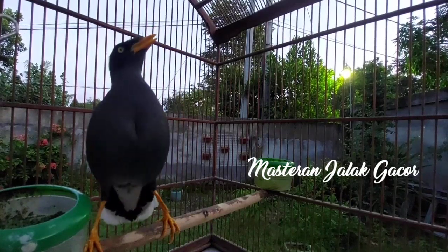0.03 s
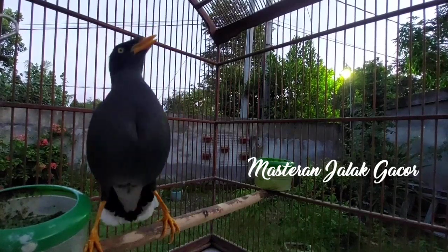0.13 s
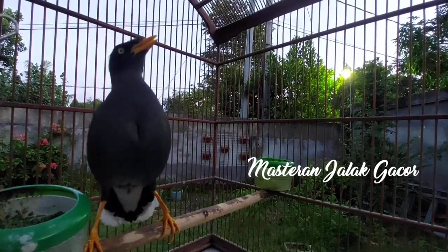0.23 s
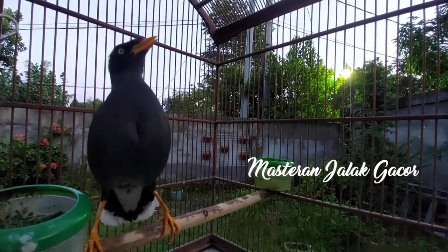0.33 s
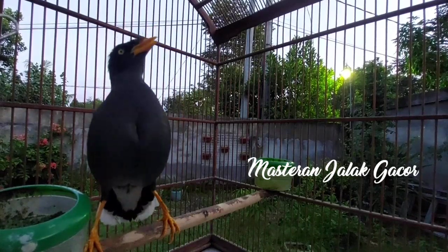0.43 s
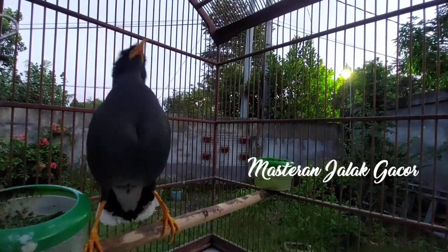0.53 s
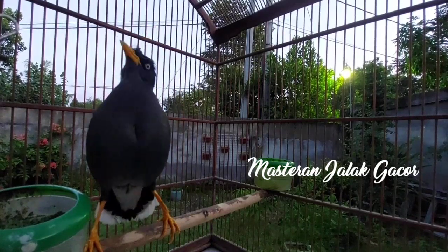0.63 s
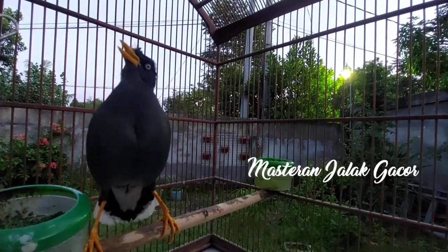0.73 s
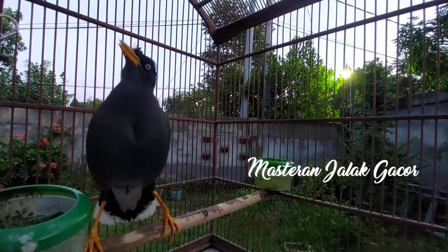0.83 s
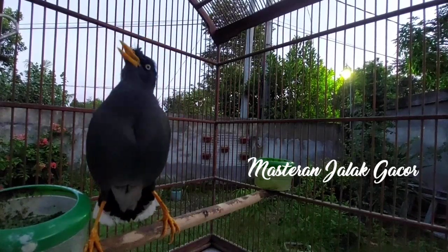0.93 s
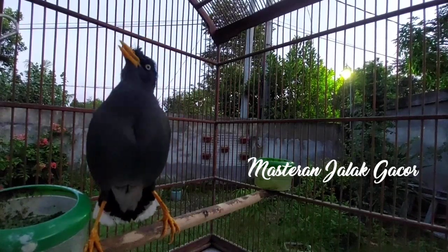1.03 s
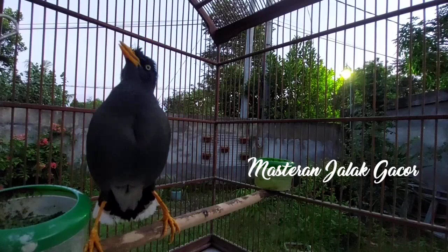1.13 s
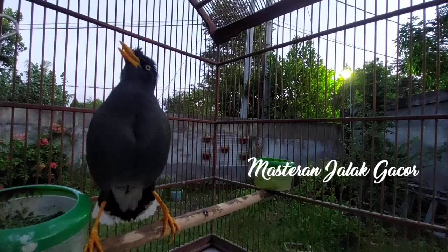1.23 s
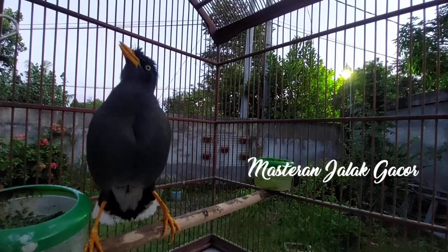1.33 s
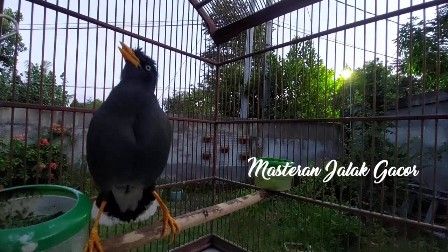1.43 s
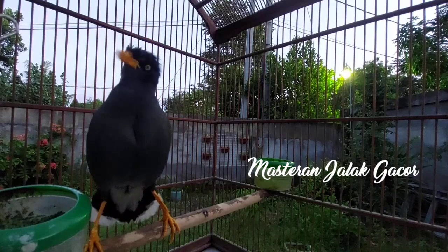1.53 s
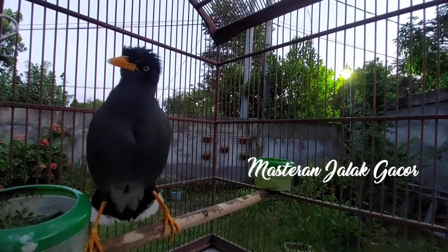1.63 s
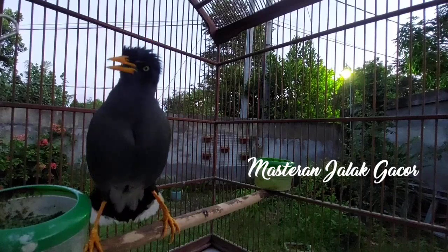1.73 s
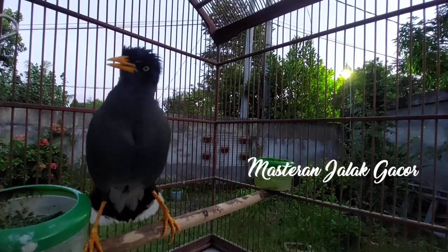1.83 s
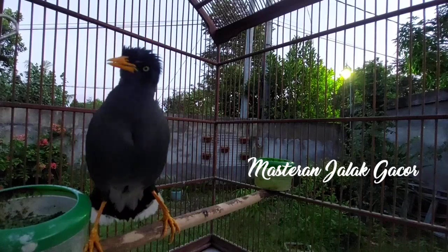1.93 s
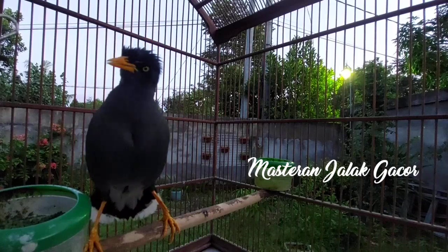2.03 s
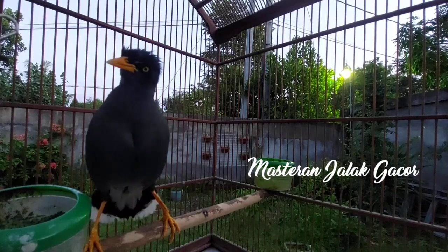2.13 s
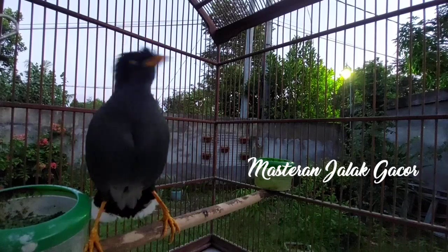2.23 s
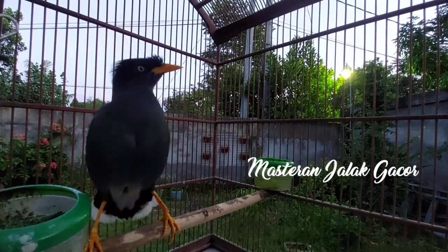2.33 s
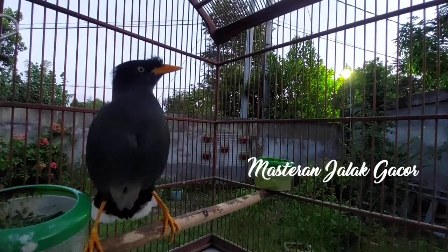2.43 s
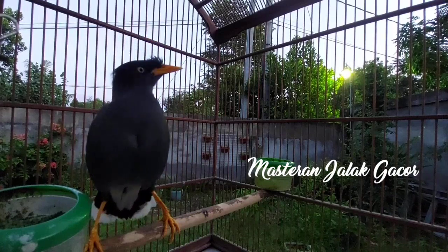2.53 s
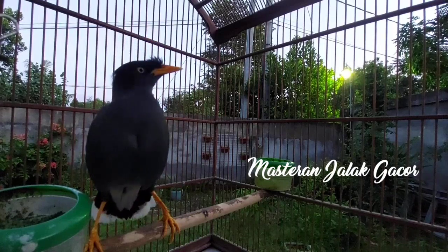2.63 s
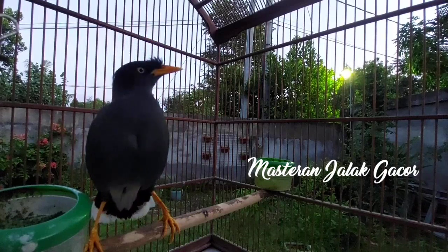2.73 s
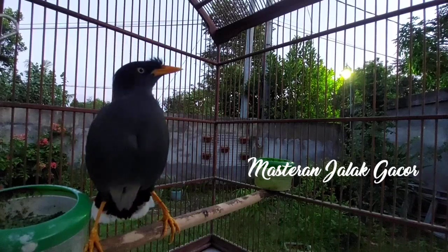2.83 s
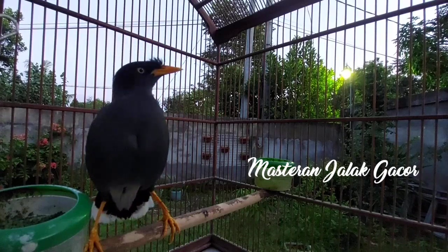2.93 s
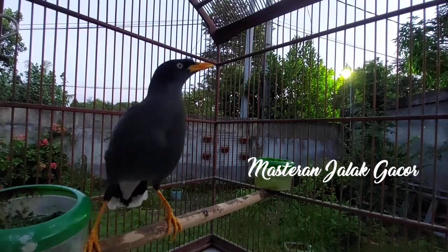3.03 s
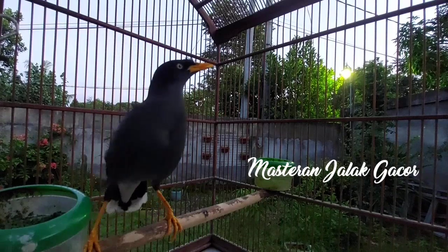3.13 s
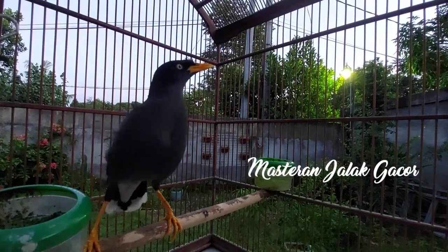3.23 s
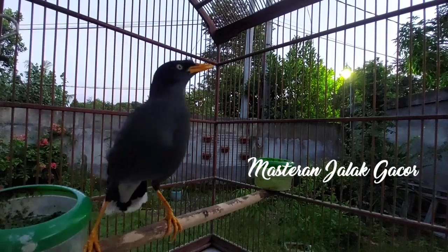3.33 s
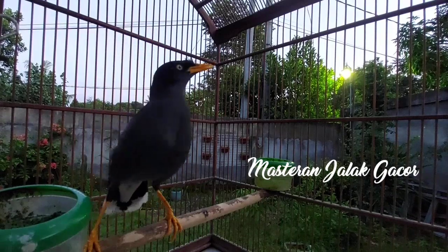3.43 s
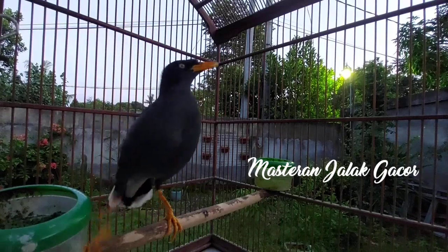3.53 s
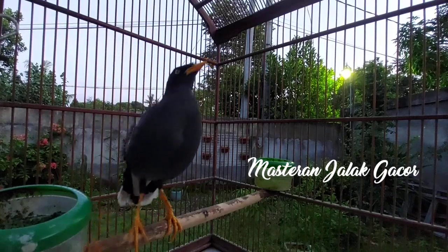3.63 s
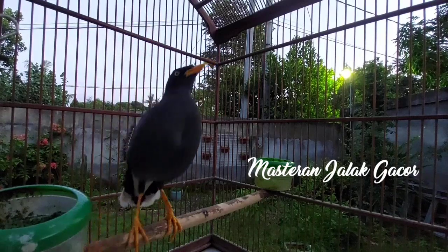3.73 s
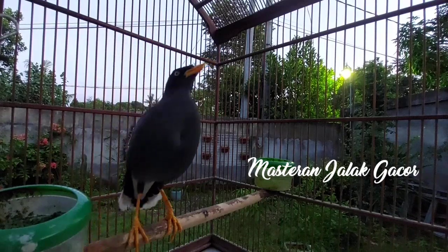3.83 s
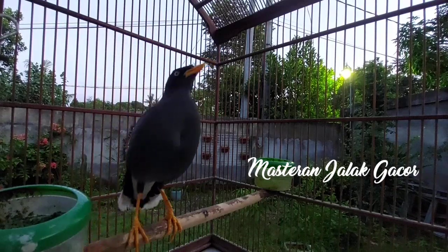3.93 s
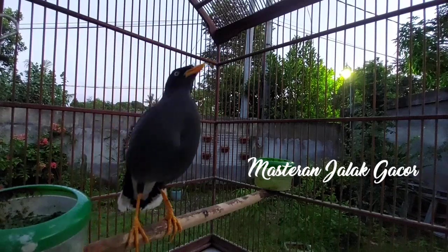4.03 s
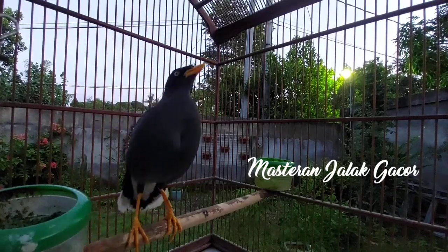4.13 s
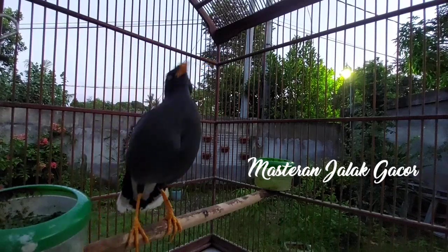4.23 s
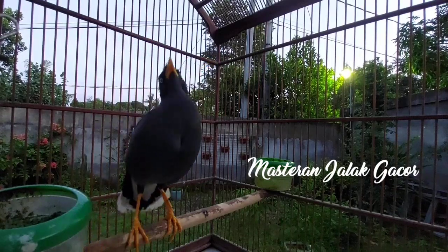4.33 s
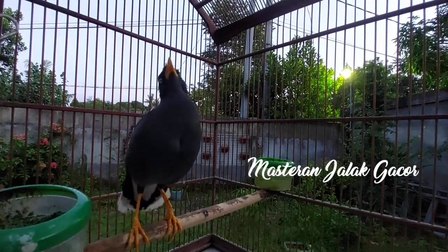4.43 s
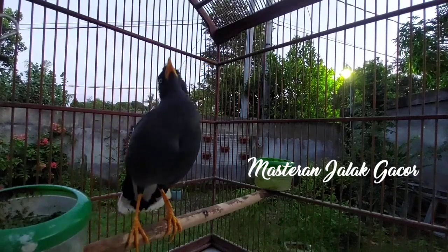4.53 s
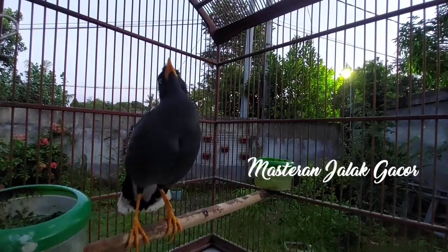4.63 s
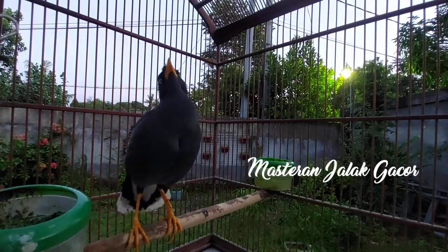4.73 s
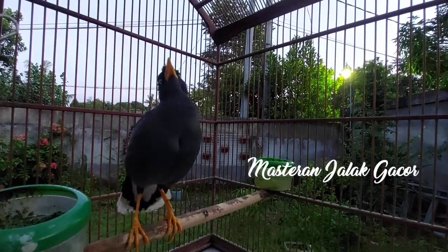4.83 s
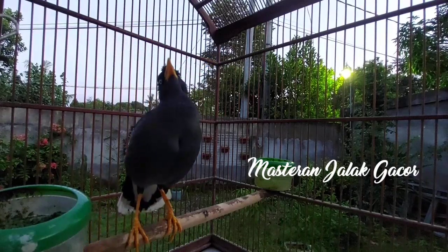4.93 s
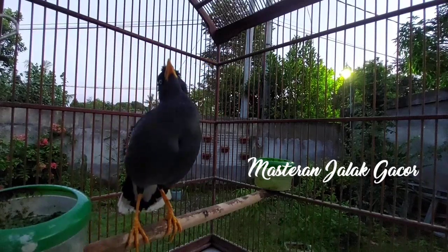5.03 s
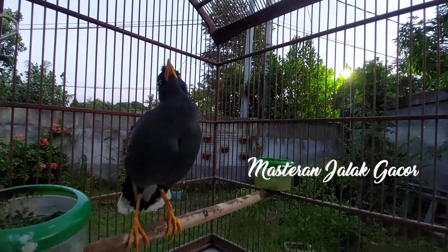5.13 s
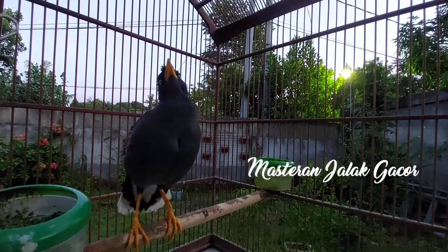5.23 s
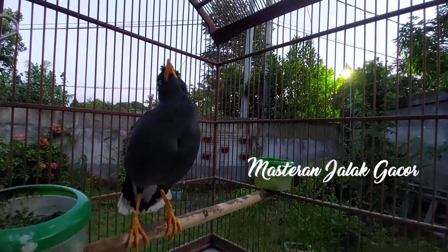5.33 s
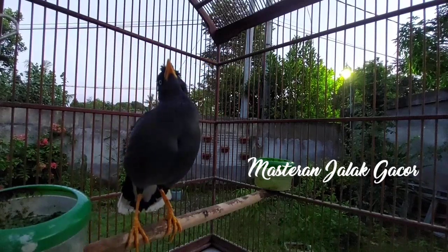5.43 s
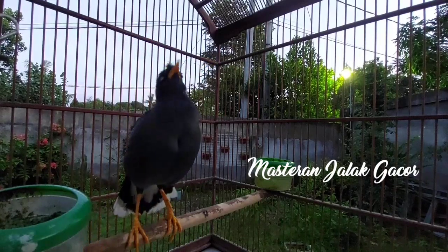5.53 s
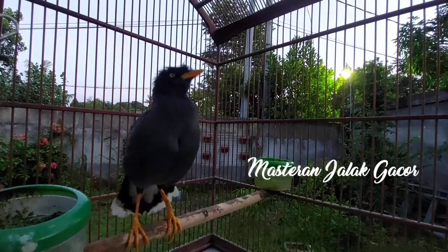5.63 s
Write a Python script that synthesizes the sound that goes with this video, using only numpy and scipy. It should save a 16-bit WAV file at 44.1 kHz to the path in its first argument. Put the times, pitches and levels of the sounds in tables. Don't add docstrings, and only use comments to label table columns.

```python
import sys
import numpy as np
from scipy import signal
from scipy.io import wavfile
from scipy.ndimage import uniform_filter1d

SR = 44100
rng = np.random.default_rng(int(sys.argv[2]) if len(sys.argv) > 2 else 0)


def dump(signal):
    limited = np.clip(np.atleast_2d(signal).T, -1, 1)
    pcm = np.round(limited * 32767).astype(np.int16)
    wavfile.write(sys.argv[1], SR, pcm)


def boost(x):
    u = np.asarray(x, float) / 20
    return 10 ** u


N = 250488


def evened(x):
    return x / np.sqrt(np.mean(x ** 2) + 1e-20)


def read(points, hz):
    f, value = np.transpose(points)
    return np.interp(np.log(hz + 1), np.log(f + 1), value)


def along(rows, column=1):
    rows = np.array(rows)
    return np.interp(np.arange(N) / SR, rows[:, 0], rows[:, column])


def add(mix, s, sound):
    part = mix[..., round(s * SR):][..., :sound.shape[-1]]
    part += sound[..., :part.shape[-1]]


def wander(count, size):
    step = max(int(size) // 32, 1)
    coarse = rng.standard_normal(count // step + 2)
    for _ in range(2):
        coarse = uniform_filter1d(coarse, int(size) // step)
    return evened(np.interp(np.arange(count) / step, np.arange(len(coarse)), coarse))


def resonate(x, hz, width_hz):
    turn = np.exp(2j * np.pi * hz * np.arange(len(x)) / SR)
    r = np.exp(-np.pi * width_hz / SR)
    smooth = signal.lfilter([(1 - r) ** 2], [1, -2 * r, r * r], x / turn + 1e-18)
    return 2 * (turn * smooth).real


def myna():
    return chirps() + trill() + whistles() + rises() + falls() + pipes() + arches()


# (time [s], pitch [Hz], level [dB])
CHIRPS = [
    [(.02, 2130, -39), (.03, 4010, -22.5), (.036, 4500, -34), (.05, 4340, -32), (.068, 4360, -49)],
    [(.023, 1340, -31), (.032, 2030, -33), (.05, 2140, -30), (.07, 2050, -38.5), (.088, 1980, -53)],
]


def chirps():
    notes = [once(curve, turn_db=-1.5) for curve in CHIRPS]
    return sing(notes, WHISTLE_VOICE, rough=.14, breath_db=-22, effort=.05)


# (time [s], pitch [Hz], level [dB])
TRILL = [(.112, 3120, -52), (.118, 3440, -21.5), (.14, 2987, -16.5), (.225, 2837, -14), (.272, 2800, -14.5),
         (.295, 2786, -18), (.342, 2748, -18), (.357, 2792, -20.5), (.368, 2700, -55)]
# (left port [dB], extra at right port [dB])
TRILL_VOICE = [0, -28, -45, -59], [0, 5, -3, -4]


def trill():
    return sing([once(TRILL, turn_db=-2)], TRILL_VOICE, rough=.015, breath_db=-46, effort=.8)


# (time [s], pitch [Hz], level [dB])
WHISTLES = [
    [(1.537, 5880, -35.5), (1.539, 4930, -21), (1.543, 3340, -18), (1.546, 3940, -14), (1.55, 3550, -18.5),
     (1.579, 3045, -11), (1.616, 2894, -11), (1.648, 2878, -17.5), (1.67, 2970, -47.5)],
    [(1.826, 5860, -20.5), (1.8295, 4200, -17), (1.833, 3955, -12.5), (1.86, 3170, -15.5),
     (1.872, 3047, -8), (1.888, 2901, -8.5), (1.936, 2831, -18.5), (1.95, 2764, -28.5), (1.958, 2750, -51)],
]
# (start [s], length [s], from [Hz], to [Hz], level [dB])
FLICKS = [
    (1.519, .008, 4120, 5500, -29),
    (1.802, 0.012, 3700, 5700, -29),
    (1.816, .007, 6900, 7400, -46),
    (4.099, 0.0059, 1640, 1760, -31),
]
# (left port [dB], extra at right port [dB])
WHISTLE_VOICE = [0, -25, -37, -46.5, -51], [0, 6, -13.5, -9, 0.5]


def whistles():
    notes = [flick(*row) for row in FLICKS] + [once(curve, turn_db=-1.5) for curve in WHISTLES]
    return sing(notes, WHISTLE_VOICE, rough=.01, breath_db=-50, effort=.8)


def flick(start_s, length_s, from_hz, to_hz, db):
    t = np.linspace(0, length_s, int(length_s * 2000))
    hz = from_hz + (to_hz - from_hz) * (t / length_s) ** 1.06
    effort_db = swell(t, 0.00203, -1.5, 0.0077, -1.6, 0.0044, -10.5, bend=0.48)
    return sung(start_s, t, hz, db + effort_db, turn_db=-1.5)


# (time [s], pitch [Hz], level [dB])
RISES = [
    [(0.556, 562, -62), (.576, 928, -31.5), (.583, 986, -19), (.592, 1095, -16.5), (.61, 1199, -10.5),
     (.62, 1210, -17.5), (.629, 1233, -21), (.64, 1264, -46)],
    [(.805, 770, -36), (.817, 910, -33.5), (.827, 1032, -18), (.849, 1180, -13), (.859, 1193, -17.5),
     (.876, 1140, -50)],
    [(1.022, 747, -39), (1.034, 882, -32.5), (1.052, 996, -18.5), (1.068, 1110, -17.5),
     (1.078, 1176, -11.5), (1.094, 1163, -14), (1.104, 1147, -37.5)],
    [(1.268, 808, -42), (1.278, 913, -30), (1.29, 1080, -17.5), (1.308, 1184, -11.5), (1.322, 1200, -13),
     (1.334, 1133, -21), (1.344, 1096, -40.5)],
]
# (left port [dB], extra at right port [dB])
RISE_VOICE = [-3.5, 0.89, 0.011, -2.5, -11, -16, -23.5, -29.5, -25, -32.5, -34, -28], [3.5, 2.1, 0.0018,
              0.5, 0, -6.5, -30, 4, -5.5, -12.5, 2.5, -11]


def rises():
    notes = [once(curve, turn_db=-2) for curve in RISES]
    return sing(notes, RISE_VOICE, rough=.15, breath_db=-25, effort=.2)


# (start [s], length [s], from [Hz], level [dB], crack level [dB])
FALLS = [
    (3.153, 0.044, 1504, -19.5, -26.5),
    (3.374, 0.062, 1526, -15.5, -25.5),
    (3.625, 0.05, 1551, -11.5, -20),
    (3.876, 0.045, 1499, -13, -22),
]
# (left port [dB], extra at right port [dB])
FALL_VOICE = [-1.5, 0.19, -15, -38, -29.5, -39.5, -30, -43], [2, 0, 6, 18, 2, 11, 2, -6]


def falls():
    notes = [fall(*row) for row in FALLS]
    out = sing(notes, FALL_VOICE, rough=.06, breath_db=-38, effort=.3)
    for rows in notes:
        add(out, *crack(rows))
    return out


def fall(start_s, length_s, from_hz, db, crack_db):
    t = np.linspace(0, length_s, int(length_s * 2000))
    hz = from_hz - 381 * (t / length_s) ** 3.6
    effort_db = swell(t, .009, -8, 0.6 * length_s, -4, 0.012, crack_db - db, bend=0.65)
    return sung(start_s, t, hz, db + effort_db, turn_db=5.5)


def crack(rows):
    s, hz, db, _ = rows[-1]
    t = np.arange(1500) / SR
    slap_hz = hz * 0.72 * np.exp(-t / 0.073 + 0.36 * wander(len(t), 27))
    slaps = np.diff(np.floor(np.cumsum(slap_hz) / SR), prepend=0)
    slaps = slaps * boost(2 * wander(len(t), 26))
    ring = resonate(slaps, 2450, 590)
    ring = ring + boost(-5.0) * resonate(slaps, 1780, 590) + boost(-14.5) * resonate(slaps, 3000, 4000)
    decay_db = -60 * np.maximum(t - .01, 0) / 0.071
    ring = evened(ring) * boost(db - 2.5 + decay_db) * np.minimum(t / 0.0011, 1)
    return s - .003, np.array([ring, boost(-1.5) * np.roll(ring, 5)])


# (time [s], pitch [Hz], level [dB], left minus right [dB])
PIPES = [
    [(4.103, 3220, -56, 0), (4.113, 2960, -27.5, 2), (4.123, 2610, -29, 2.5), (4.129, 2535, -13, 4),
     (4.137, 2386, -12.5, 4), (4.183, 2187, -17.5, 13), (4.197, 2190, -54, 10)],
    [(4.216, 3350, -51, -1), (4.224, 3000, -27.5, 2), (4.234, 2643, -16.5, 3.5), (4.248, 2380, -14, 4.5),
     (4.266, 2284, -17.5, 8.5), (4.29, 2296, -18.5, 8.5), (4.304, 2347, -31, 1), (4.315, 2350, -49, 4)],
    [(4.327, 3360, -40, -3), (4.333, 3030, -36.5, 1.5), (4.341, 2740, -18, 4), (4.35, 2534, -19, 2.5),
     (4.362, 2383, -18.5, 4), (4.386, 2333, -17.5, 6), (4.412, 2242, -24.5, 10), (4.425, 2250, -56, 8)],
    [(4.439, 3720, -46, 3), (4.446, 3000, -26, 4), (4.458, 2606, -18.5, 2.5), (4.474, 2290, -16.5, 10),
     (4.49, 2238, -20.5, 7), (4.52, 2243, -19, 12), (4.536, 2170, -28.5, 8), (4.548, 2240, -56, 9)],
    [(4.565, 3480, -42, 2), (4.572, 3030, -30.5, 4), (4.58, 2654, -20.5, 1), (4.592, 2414, -17, 7.5),
     (4.608, 2274, -18.5, 8.5), (4.64, 2234, -19, 12), (4.652, 2240, -35, 7), (4.66, 2190, -51, 9)],
]
# (left port [dB], extra at right port [dB])
PIPE_VOICE = [0, -22, -31.5, -43, -47, -45.5], [0, 3.5, -2, 4, 3, 2]


def pipes():
    return sing([pipe(curve) for curve in PIPES], PIPE_VOICE, rough=.012, breath_db=-39, effort=.9)


def pipe(curve):
    s, hz, db, pan_db = np.transpose(curve)
    return np.transpose([s, hz, db + 8.0 - 0.26 * pan_db, -pan_db])


# (time [s], pitch [Hz], level [dB])
ARCHES = [
    [(4.855, 1654, -40.5), (4.873, 1803, -33), (4.893, 1953, -22), (4.907, 2013, -20), (4.937, 2044, -18.5),
     (4.985, 1940, -19.5), (5.031, 1775, -23.5), (5.045, 1825, -35), (5.053, 1860, -52)],
    [(5.207, 1514, -43), (5.229, 1760, -36), (5.238, 1907, -26), (5.256, 2040, -19.5), (5.3, 2095, -15.5),
     (5.35, 1993, -18.5), (5.396, 1784, -21), (5.426, 1749, -28), (5.44, 1705, -52)],
]
# (left port [dB], extra at right port [dB])
ARCH_VOICE = [-12, 0.071, -3.5, -10.5, -22, -23.5, -26, -29], [3.5, 0.93, -2, -5.5, -3, -2, -1, 1]


def arches():
    notes = [once(curve, turn_db=9.5) for curve in ARCHES]
    return sing(notes, ARCH_VOICE, rough=.015, breath_db=-54, effort=.7)


def sing(notes, voice, rough, breath_db, effort):
    out = np.zeros((2, N))
    for rows in notes:
        add(out, *note(rows, voice, rough, breath_db, effort))
    return out


def once(curve, turn_db):
    return sung(0, *np.transpose(curve), turn_db=turn_db)


# (pitch [Hz], right minus left [dB])
RIGHT_PORT = [(1200, -4.5), (1500, -14), (2050, -14), (2230, -9), (2380, -12), (2720, 3), (2920, -9),
              (3500, -5)]


def sung(start_s, t, hz, db, turn_db):
    return np.transpose([start_s + t, hz, db, read(RIGHT_PORT, hz) + turn_db])


def swell(t, bite_s, bite_db, peak_s, hold_db, release_s, end_db, bend):
    at = np.maximum.accumulate([0, bite_s, peak_s, t[-1] - release_s, t[-1]])
    efforts = boost(np.array([-45, bite_db, 0, hold_db, end_db]) / bend)
    return 20 * bend * np.log10(np.interp(t, at, efforts))


# (frequency [Hz], gain [dB])
THROAT = [(600, 9.5), (1200, -10.5), (1780, 7.5), (2080, 0.5), (2500, 3), (3500, 5.5), (4700, -1.5),
          (5400, 4.5), (6300, 2), (7400, 9.5), (9000, 4.5), (15000, 5.5)]
# (time [s], right port delay [samples])
HEAD = [(0, 10.55), (1.95, 11.2), (3.1, 7.15), (4.3, 5.62), (4.7, 7.2), (5.6, 7.1)]


def note(rows, voice, rough, breath_db, effort):
    s, hz, db, right_db = np.transpose(rows)
    t = np.arange(s[0] - .001, s[-1] + 0.0032, 1 / SR)
    count = len(t)
    hz = uniform_filter1d(np.interp(t, s, hz), size=130)
    edge = signal.windows.tukey(count, 0.0018 / (t[-1] - t[0]))
    left_level = np.interp(t, s, boost(db))
    right_level = np.interp(t, s, boost(db + np.minimum(right_db, 3)))
    level = uniform_filter1d([left_level, right_level], size=60) * edge
    push = level[0] / level[0].max() + 0.029
    for at, depth, ms in catches():
        u = (t - at) * 1000 / ms
        level = level * (1 - np.clip(depth, -2, 1.3) * np.exp(-u ** 2))
        hz = hz * (1 - .05 * depth * u * np.exp(-u ** 2))
    hoarse = rough * (1 + 0.16 * (1 - push))
    hz = hz * (1 + .07 * hoarse * wander(count, 30) + .001 * wander(count, 200))
    turns = np.cumsum(hz) / SR

    k = np.arange(1, len(voice[0]) + 1)[:, None]
    left_db, extra_db = np.array(voice)[..., None]
    gains = boost(left_db + read(THROAT, k * hz)) * push ** (effort * np.sqrt(k - 1)) * (k * hz < 16000)
    gains = gains / np.sqrt((gains ** 2).sum(0) / 2)
    flutter = np.array([wander(count, 42) + 1j * wander(count, 72) for _ in k])
    gains = gains * (1 + np.minimum((hoarse + 0.0044) * boost(-.6 * left_db), .8) * flutter)
    coming = np.array([np.abs(wander(count, 350)) - .6 for _ in k])
    gains = gains * boost(.22 * (left_db - 8 * (k > 1)) * coming)

    breath = np.diff(rng.standard_normal(count + 1))
    breath = boost(breath_db) * (0.43 + np.cos(np.pi * turns) ** 2) * breath
    late = np.interp(s[0], *np.transpose(HEAD))
    spin = np.exp(1j * (2 * np.pi * k * turns + 1.0 * k ** 2))
    delay = np.exp(-2j * np.pi * k * hz * late / SR)
    left = (gains * spin).imag.sum(0) + breath
    right = (boost(extra_db) * gains * spin * delay).imag.sum(0) + np.roll(breath, round(late))
    return t[0], level * np.array([left, right])


# (first [s], last [s], every [s], depth [1 = full, < 0 = surge], width
# [ms])
SHUTS = [(.128, .1672, .0098, .75, 1.7), (.183, .2674, .01688, 1.08, 2.7),
         (4.1315, 4.1645, .0165, .97, 4.3), (1.5485, 1.5485, .1, .45, 1.5), (1.567, 1.572, .005, .3, 1.2),
         (1.618, 1.618, .1, .3, 1.5), (4.232, 4.232, .1, .4, 1.5), (.121, .121, .1, .5, 1.2),
         (4.945, 4.945, .1, .2, 14), (4.886, 4.922, .018, .35, 1.2), (5.262, 5.262, .1, .4, 1.2),
         (5.33, 5.33, .1, .2, 9), (.6145, .6145, .1, .6, 1.3), (.571, .599, .0047, .4, 1),
         (.815, .84, .005, .35, 1), (1.276, 1.312, .0052, .55, 1.1), (1.036, 1.066, .005, .35, 1),
         (1.279, 1.279, .1, -1.2, .8), (1.082, 1.082, .1, .4, 1.2), (3.186, 3.186, .1, .6, 4),
         (3.423, 3.423, .1, .75, 4), (3.667, 3.667, .1, .7, 3.5), (3.912, 3.912, .1, .5, 4),
         (4.453, 4.453, .1, .6, 1.6), (4.587, 4.587, .1, .8, 2.1), (.036, .036, .1, .7, 1.5)]


def catches():
    shuts = []
    for first, last, every, depth, ms in SHUTS:
        shuts += [(s, depth, ms) for s in np.arange(first, last + every / 2, every)]
    return shuts


# (time [s], peak [dB], brightness [Hz])
KNOCKS = [
    (3.162, -24.5, 660),
    (5.617, -11, 13900),
]
# (frequency [Hz], level [dB], t60 [s])
CAGE = [(288, -18, .12), (440, -15, .06), (590, -13, .04), (730, -9, .04), (868, 0, .035), (1050, -4, .04),
        (1280, -6, .025), (1560, -3, .03), (1760, 0, .025), (2300, -1, .02), (3000, -5, .02),
        (3850, -9, .015), (5800, -13, .01), (7300, -10, .012)]


def cage():
    out, t = np.zeros(N), np.arange(4000) / SR
    for s, db, hz_top in KNOCKS:
        hit = 0
        for hz, mode_db, t60 in CAGE:
            rebounds = (rng.random(len(t)) < .03) * rng.standard_normal(len(t)) * boost(-60 * t / 0.13) * .5
            rebounds[0] = 1
            ring = boost(mode_db - 60 * t / t60) * np.sin(2 * np.pi * hz * t)
            ring = ring * np.minimum(t / 0.0026, 1) / (1 + (hz / hz_top) ** 4)
            hit = hit + signal.fftconvolve(ring, rebounds)[:len(t)]
        wire_hiss = resonate(rng.standard_normal(len(t)), hz_top / 6.0, hz_top / 1.7)
        hit = hit + boost(-4.5 - 60 * t / 0.093) * wire_hiss
        add(out, s, boost(db) * hit / np.abs(hit).max())
    return np.array([out, boost(-7.0) * np.roll(out, 7)])


# (frequency [Hz], t60 [s])
WALLS = [(500, 0.23), (1200, 0.37), (2400, 0.47), (3000, 0.42), (3600, 0.43), (4200, 0.42), (5000, 0.24),
         (12000, 0.11)]


def walls(x):
    taps = np.zeros((2, SR))
    at = np.arange(300, SR - 40, 40) + rng.integers(0, 40, (2, (SR - 301) // 40))
    echoes = rng.choice([-1., 1.], at.shape) * rng.exponential(1, at.shape)
    np.put_along_axis(taps, at, echoes, 1)
    hz, t, z = signal.stft(taps, SR, nperseg=256)
    decay = boost(-60 * t / read(WALLS, hz)[:, None]) + boost(2.0 - 60 * t / .1)
    tail = signal.istft(z * decay, SR, nperseg=256)[1]
    return signal.fftconvolve(x[:1], tail / np.linalg.norm(tail[0]), axes=1)[:, :N]


# (time [s], level [dB])
KATYDID = [(0.0, -57.5), (0.44, -57.5), (1.74, -59.5), (1.87, -56.5), (2.18, -65), (3.11, -63.5),
           (3.21, -52), (3.34, -55), (3.51, -53.5), (4.02, -55.5), (4.56, -58), (5.31, -63), (5.68, -64)]


def katydid():
    strokes_per_s = 138.9
    turn = np.cumsum(strokes_per_s * (1 + 0.0006 * wander(N, 7700))) / SR % 1
    hz = 12400 - 3900 * turn + 150 * wander(N, 60)
    stroke = np.exp(-((turn - .36) / .24) ** 2) * boost(1.5 * wander(N, 250))
    x = evened(stroke * np.sin(2 * np.pi * np.cumsum(hz) / SR)) * boost(along(KATYDID) + 2.5)
    foliage = rng.standard_normal(900) * boost(-60 * np.arange(900) / SR / .03)
    scattered = signal.fftconvolve(x, foliage)[:N]
    scattered = scattered * np.std(x) / np.std(scattered)
    return np.array([[.65, .75], [.15, .5]]) @ np.array([x, scattered])


# (time [s], level [dB])
CRICKETS = [(0, -50), (.5, -56.5), (1, -56.5), (1.7, -55), (2.3, -59), (3.1, -60.5), (3.5, -58), (4, -59.5),
            (4.8, -63.5), (5.68, -67)]


def crickets():
    out = np.zeros((2, N))
    # (clicks per s, wing Hz, width Hz, dB, right dB, dB gained after tiring)
    for per_s, hz, width_hz, db, right_db, tire_db in [
            (187.6, 7350, 1000, -4, -1, 0), (193.5, 6200, 1200, -7, 1, -5), (207, 5200, 800, -11, 0, -16)]:
        clicks = np.diff(np.floor(np.cumsum(per_s * (1 + 0.0022 * wander(N, 9000))) / SR), prepend=0)
        leaves = rng.standard_normal((2, 1500)) * boost(-60 * np.arange(1500) / SR / 0.11)
        leaves = leaves / np.linalg.norm(leaves[0])
        level_db = db + 2.5 * wander(N, 4000) + along([(2.2, 0), (2.6, tire_db)])
        x = evened(resonate(clicks, hz, width_hz)) * boost(level_db)
        out += boost([[0], [right_db]]) * signal.fftconvolve(x[None], leaves, axes=1)[:, :N]
    return out * boost(along(CRICKETS) + 3.0)


# (multiple of firing rate, level [dB])
ENGINE = [(1, -56.5), (2, 8.5), (3, -10), (4, 2.5), (5, -3.5), (6, -10.5), (7, -19.5), (8, -11.5), (9, -12),
          (10, -28), (11, -9.5)]
# (time [s], firing rate [Hz], level [dB])
ENGINE_RUN = [(3.13, 35.02, -56.5), (3.17, 34.87, -38), (3.6, 34.37, -39), (4.2, 34.51, -41),
              (4.8, 35.25, -51), (5.2, 33.25, -54)]
# (frequency [Hz], width [Hz], from [s], to [s], level [dB])
HUMS = [(64.4, 22, -0.5, 2.89, -50), (345.3, 39, -3.1, 3.6, -58.5), (677, 10, 5.5, 4.6, -64.5),
        (91.1, 4.4, 5, 5.9, -47), (99.5, 27, 3, 5.9, -50.5)]


def engine():
    t = np.arange(N) / SR
    turns = np.cumsum(along(ENGINE_RUN) * (1 + 0.00693 * wander(N, 4932))) / SR
    x = np.zeros(N)
    for k, db in ENGINE:
        x = x + boost(db + 1.06 * wander(N, 3000)) * np.sin(2 * np.pi * (k * turns + rng.random()))
    x = evened(x) * boost(along(ENGINE_RUN, column=2)) * (t > 3.12)
    for hz, width_hz, start, end, db in HUMS:
        fade = np.interp(t, [start - .1, start, end, end + 0.18], [0, 1, 1, 0])
        x = x + boost(db) * evened(resonate(rng.standard_normal(N), hz, width_hz)) * fade
    return np.array([x, boost(-2.9) * x])


# (frequency [Hz], level [dB])
FAN = [(263.8, -71.5), (349.9, -66), (479.1, -77.5), (538.3, -77.5), (635.2, -72.5), (705.2, -71),
       (726.7, -79.5), (850.6, -74.5), (952.8, -76)]


def fan():
    x = np.zeros((2, N))
    for part in x:
        for hz, db in FAN:
            part += boost(db + 1.5) * evened(resonate(rng.standard_normal(N), hz, 12.0))
    return np.array([[.9, 0.17], [.9, -.3]]) @ x


# (frequency [Hz], density [dB per Hz])
TRAFFIC = [(15, -61.5), (25, -30), (76, -3), (147, -17), (218, -21), (332, -19), (661, -26), (712, -21.5),
           (911, -23.5), (2900, -31), (9000, -45), (11700, -74), (19800, -120)]
# (time [s], level [dB])
TRAFFIC_DB = [(0, -48), (1, -54.5), (1.9, -49.5), (2.2, -65), (3.13, -61), (3.16, -40.5), (4.1, -42.5),
              (4.6, -50), (5.1, -53), (5.68, -51.5)]


def traffic():
    return boost(along(TRAFFIC_DB)) * hiss(TRAFFIC, patchy_db=4.5)


# (frequency [Hz], density [dB per Hz])
AIR = [(15, -40), (30, -27), (69, -5.5), (215, -12), (340, -10), (420, -18), (700, -12), (1170, -27),
       (1500, -38), (3500, -44), (6400, -34), (7500, -28), (8600, -36), (11000, -32), (12500, -66),
       (15500, -66)]


def air():
    return boost(-54.5) * hiss(AIR, patchy_db=7.5)


# (frequency [Hz], left-right likeness [-1 to 1])
SAME = [(60, 0.89), (150, 0.82), (380, 0.52), (950, -0.29), (2380, -0.45), (5980, 0.62), (15000, -0.36)]


def hiss(spectrum, patchy_db):
    frames, hz = N // 256 + 5, np.fft.rfftfreq(1024, 1 / SR)
    a, b, c, d, patches = rng.standard_normal((frames, 513, 5)).T
    patches = evened(uniform_filter1d(uniform_filter1d(patches, 10, 0), 14, 1))
    same = np.clip(read(SAME, hz), -1, 1)[:, None]
    left = a + 1j * b
    z = np.array([left, same * left + np.sqrt(1 - same ** 2) * (c + 1j * d)])
    patch_db = patchy_db * np.clip(hz / 2500, .25, 1)[:, None] * patches
    z *= boost(read(spectrum, hz)[:, None] + patch_db)
    return evened(signal.istft(z, nperseg=1024, noverlap=768)[1][:, :N])


def gate(x, under_db, quiet_db, depth_db):
    z = signal.stft(x, nperseg=2048, noverlap=1536)[2]
    power = uniform_filter1d(uniform_filter1d(abs(z) ** 2, size=14, axis=1), size=3, axis=2)
    band_db = 10 * np.log10(power + 1e-16)
    limit_db = np.maximum(band_db.max(1, keepdims=True) - under_db, quiet_db)
    gain = boost(-depth_db * np.clip(limit_db - band_db, 0, 1))
    return signal.istft(z * gain, nperseg=2048, noverlap=1536)[1][:, :N]


def sensor():
    bands = []
    for _ in range(2):
        band = resonate(rng.standard_normal(N), 15050, 706.4)
        bands.append(evened(resonate(band, 15050, 706.4)))
    return boost(-85 + 4.79 * wander(N, 5000)) * np.array(bands)


def scene():
    near = myna() + cage()
    echo = boost([[-24], [-24.5]]) * walls(near)
    return near + echo + katydid() + crickets() + engine() + fan() + traffic() + air()


def band_limit(x):
    return signal.sosfilt(signal.butter(12, 15780, fs=SR, output="sos"), x)


def record(dry):
    dry = signal.sosfilt(signal.butter(2, 36, "high", fs=SR, output="sos"), dry)
    gated = gate(dry, under_db=47.5, quiet_db=-96, depth_db=24)
    edge_hz = 15720
    edge = signal.firwin(2047, edge_hz, window=("kaiser", 9), fs=SR)
    mix = signal.oaconvolve(gated + sensor(), edge[None], "same")
    return band_limit(mix)


dry = scene()
out = record(dry)
dump(out)
```